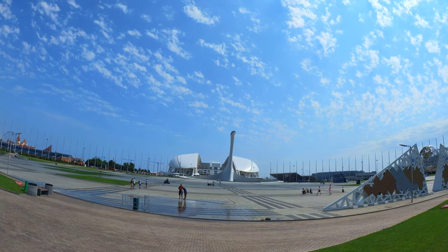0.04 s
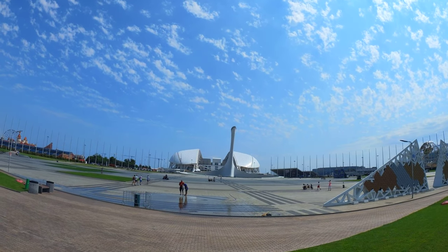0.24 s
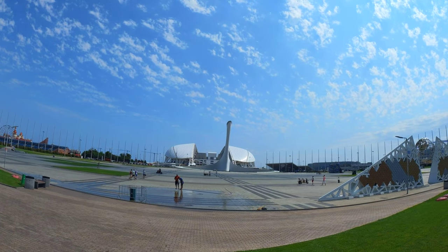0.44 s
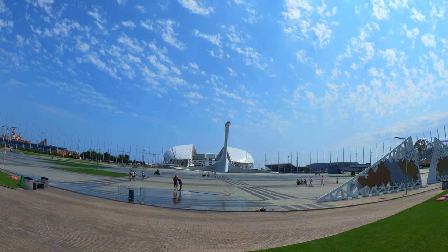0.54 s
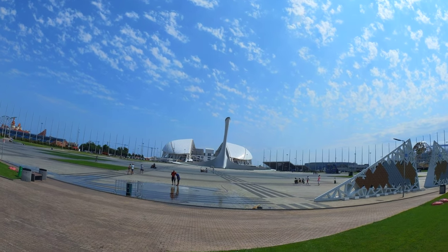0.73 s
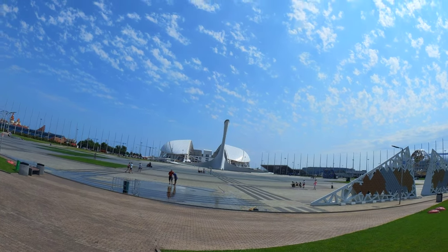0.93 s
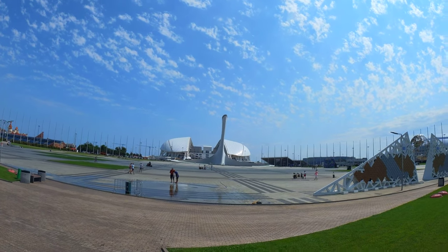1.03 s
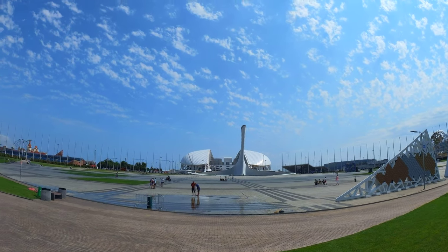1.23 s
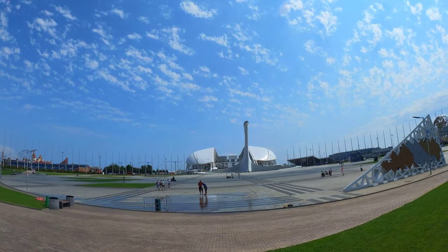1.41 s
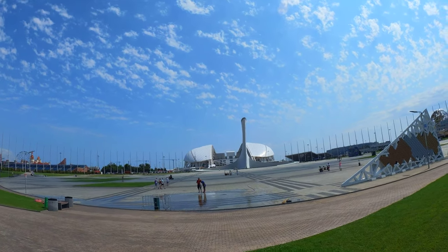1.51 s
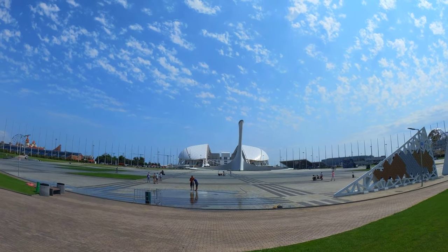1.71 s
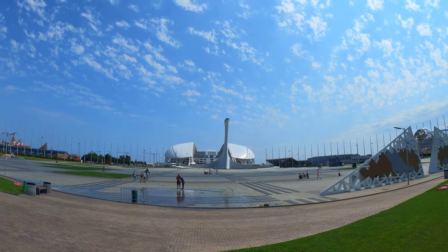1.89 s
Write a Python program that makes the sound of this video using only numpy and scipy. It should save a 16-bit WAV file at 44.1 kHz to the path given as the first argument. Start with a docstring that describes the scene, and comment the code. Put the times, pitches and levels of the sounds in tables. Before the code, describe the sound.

Close, rough wind noise on two unprotected microphone ports, fluttering bass thuds and gritty airy bursts, a few dry knocks and faint loose-part chatter; wide at first, then centred and quieter, ending in light hiss.

```python
"""Gusty wind on two bare microphone ports

The wind blows on a small camera carried across an open paved square. Eddies thump on each port as
swelling pressure swings, over a lumpy rumble of shaped noise. Noise rings the port cavities as a whistle
with a thin hiss; knocks and loose parts ring as short decaying tones. After a second the right channel
fades over to the left port's sound."""
import sys
import numpy as np
from scipy import signal
from scipy.fft import rfft, irfft
from scipy.io import wavfile

SR = 44100
rng = np.random.default_rng(int(sys.argv[2]) if len(sys.argv) > 2 else 0)


def master_out(mix):
    """Clip the mix to full scale and print it as 16-bit PCM to the path in sys.argv[1]."""
    frames = np.transpose(np.atleast_2d(mix))
    ceiling = np.clip(frames, -1, 1)
    pcm = np.round(ceiling * 32767).astype(np.int16)
    wavfile.write(sys.argv[1], SR, pcm)


N = 85995

MONO_FROM_S, MONO_FADE_S = 1.003, 0.0019   # start and length of the fade to the left port alone


def amp(db):
    """Turn decibels into a gain."""
    return 10 ** (np.asarray(db) / 20)


def rms_one(x):
    """Scale to an average strength (rms) of 1."""
    return x / np.sqrt(np.mean(x ** 2, axis=-1, keepdims=True) + 1e-20)


def in_time(rows):
    """Join the rows of a curve by straight lines, giving each column one value per sample."""
    seconds, *columns = np.transpose(rows)
    return [np.interp(np.arange(N) / SR, seconds, column) for column in columns]


def drift(rate_hz):
    """Slow random wander for each port, with a spread of about 1: noise smoothed by a low-pass filter."""
    r = np.exp(-2 * np.pi * rate_hz / SR)
    noise = rng.standard_normal((2, N + SR))
    wander = rms_one(signal.lfilter([1], [1, -2 * r, r * r], noise))
    return wander[:, SR:]   # drop the first second, where the filter settles


def coloured(points):
    """Unrelated noise on each port, shaped by a spectrum that falls off steeply outside its ends."""
    hz, db = np.transpose(points)
    log_hz = np.log(hz)
    f = np.log(np.maximum(np.arange(N // 2 + 1) * SR / N, 1))
    shape_db = np.interp(f, log_hz, db)
    shape_db -= 40 * np.maximum(log_hz[0] - f, 0)
    shape_db -= 40 * np.maximum(f - log_hz[-1], 0)
    spectrum = rfft(rng.standard_normal((2, N)))
    return rms_one(irfft(spectrum * amp(shape_db), N))


def ring(x, hz, t60):
    """A resonance: a unit click starts a sine of height 1 that falls by 60 dB in t60 seconds."""
    r = amp(-60 / (t60 * SR))
    w = 2 * np.pi * hz / SR
    return signal.lfilter([0, np.sin(w)], [1, -2 * r * np.cos(w), r * r], x + 1e-18)


def mono_share():
    """0 while both ports are in use, 1 once only the left is."""
    return np.clip((np.arange(N) / SR - MONO_FROM_S) / MONO_FADE_S, 0, 1)


def buffets():
    """Each eddy is a few uneven pressure swings of wandering pitch under a bell-shaped swell."""
    # Eddies bursting on the left port, then on the right port.
    # Each row: middle in seconds, level in dB before the low-pass, pitch in Hz that the swings wander around.
    eddies = [
        [(0.148, -15.5, 184), (0.191, -9, 292), (0.218, -15, 221), (0.259, -13.5, 154), (0.307, -4, 203.7),
         (0.471, -12, 183), (0.504, -15.5, 244), (0.521, -8, 186.3), (0.603, -11.5, 257.6), (0.611, -8.5, 329),
         (0.695, -6.5, 156), (0.744, -11.5, 266), (0.808, -12.5, 167), (0.874, -6.5, 283), (0.913, -8, 273),
         (0.94, -11, 235), (1.046, -10.5, 300.6), (1.066, -14.5, 323), (1.382, -20.5, 154), (1.433, -27.5, 152),
         (1.506, -20.5, 134.5), (1.536, -20.5, 113), (1.56, -22.5, 112), (1.621, -22, 114), (1.947, -29, 710)],
        [(0.268, -9, 307), (0.296, -1, 235.5), (0.413, -16.5, 203.6), (0.485, -8.5, 115), (0.551, -18, 277),
         (0.66, -12.5, 200), (0.694, -16, 266), (0.825, -13.5, 231), (0.856, -6.5, 306), (0.893, -12, 169),
         (0.917, -16.5, 213), (0.997, -10.5, 181)],
    ]
    base_s, cycles = .005, 1.3   # length of a swell: a fixed part and some swings
    wobble, roughness = 0.2914, 0.57   # strength of the pitch wander and of the added noise
    out, t = np.zeros((2, N)), np.arange(N) / SR
    wander, rough = drift(95.0), drift(564.0)
    for port, rows in enumerate(eddies):
        turns = rng.uniform(0, 2 * np.pi, len(rows))
        for (s, db, hz), turn in zip(rows, turns):
            length = base_s + cycles / hz   # width of the bell at half its height
            first = max(int((s - 2 * length) * SR), 0)
            near = slice(first, int((s + 2 * length) * SR))
            pitch_factor = np.exp(wobble * wander[port, near])
            swing = np.sin(turn + 2 * np.pi * hz / SR * np.cumsum(pitch_factor))
            swell = np.exp(-np.log(16) * ((t[near] - s) / length) ** 2)
            out[port, near] += amp(db) * swell * (swing + roughness * rough[port, near])
    return signal.sosfilt(signal.butter(2, 450, fs=SR, output="sos"), out)


def rumble():
    """Low turbulence: shaped noise of lumpy level, unrelated on the two ports."""
    # Loudness under the eddies. Each row: time in seconds, level in dB before the random wander and side.
    loudness = [(0, -34.5), (.12, -38), (.2, -26.5), (.36, -29), (.5, -28), (.7, -25.5), (.9, -25.5),
                (1.015, -35.5), (1.08, -25.5), (1.12, -34.5), (1.15, -40.5), (1.2, -26.5), (1.226, -36.5),
                (1.265, -28), (1.47, -31), (1.6, -42), (1.645, -33), (1.68, -43), (1.8, -49), (1.95, -49)]
    # Tone in stereo, then in mono. Each row: frequency in Hz, relative level in dB per Hz.
    colour = [
        [(45, -64), (80, 1), (160, 1), (400, -7), (1000, -31.5)],
        [(45, 2), (80, 4), (160, 4), (400, -13), (1000, -36.5)],
    ]
    # Balance of the ports. Each row: time in seconds, left minus right in dB,
    # used 1.5 times in stereo and half in mono.
    balance = [(.14, -6.5), (.55, -1.5), (1.0, 3.5)]
    (db,), (pan_db,) = in_time(loudness), in_time(balance)
    mono = mono_share()
    noise = (1 - mono) * coloured(colour[0]) + mono * coloured(colour[1])
    side_db = (1.5 - mono) * pan_db * [[.5], [-.5]]
    lumps_db = 2.88 * drift(38.0)
    return amp(db + side_db + lumps_db) * noise


def stream():
    """Gritty airflow excites the port cavities and a thin, flickering treble hiss."""
    # Air streaming over the ports. Each row: time in seconds, level of the cavity band in dB,
    # level of the treble in dB, both before puffs, flutter and side.
    airflow = [(0, -66, -70.5), (.25, -59.5, -62), (.45, -45, -64.5), (.65, -37, -55.5), (.68, -53, -73.5),
               (.8, -44.5, -60), (.92, -49.5, -60), (1.06, -55.5, -75), (1.15, -49.5, -63), (1.4, -47, -52),
               (1.455, -65.5, -61), (1.52, -50, -51), (1.64, -59.5, -64.5), (1.7, -50.5, -51),
               (1.775, -49.5, -52), (1.81, -60, -60)]
    # Cavity resonances of the left port, then of the right. Each row: pitch in Hz, relative level in dB.
    cavities = [
        [(1400, 2), (2650, -3.5), (4300, -22)],
        [(1250, 16), (2000, 9.5), (3750, -4)],
    ]
    # How long they ring, left and right: swings until they have fallen by 60 dB.
    ring_cycles = (7, 15)
    # Treble tone in stereo, then in mono. Each row: frequency in Hz, relative level in dB per Hz.
    treble_colour = [
        [(5000, -7), (7000, -21), (10500, -5), (15500, -0.5)],
        [(4500, -9.5), (6300, -11), (8300, -7), (15500, -21)],
    ]
    roar_db, roar_power = 17, 1.29   # strong puffs also roar, in a band reaching below the cavities

    puff = puffs()
    cavity_gain, treble_gain = amp(in_time(airflow)) + puff
    mono = mono_share()
    gritty_air = rng.standard_normal((2, N)) * amp(3.5 * drift(300.0))

    cavity = []
    for air, modes, cycles in zip(gritty_air, cavities, ring_cycles):
        # neighbouring resonances have opposite signs
        cavity.append(sum(amp(db) * (-1) ** k * hz * ring(air, hz, cycles / hz)
                          for k, (hz, db) in enumerate(modes)))
    cavity = signal.sosfilt(signal.butter(2, [800, 5000], "band", fs=SR, output="sos"), cavity)
    roar = signal.sosfilt(signal.butter(2, [340, 900], "band", fs=SR, output="sos"), gritty_air)
    roar_gain = amp(roar_db) * puff[0] ** roar_power
    body = cavity_gain * rms_one(cavity) + roar_gain * rms_one(roar)

    treble = (1 - mono) * coloured(treble_colour[0]) + mono * coloured(treble_colour[1])
    flutter_db = 2.0 * drift(68.0)
    flicker_db = flutter_db + 3.0 * drift(50.0)
    right_lead_db = 2.5 * (3.5 - mono)   # right port louder than left
    side = amp(right_lead_db * [[-.5], [.5]])
    return side * (body * amp(flutter_db) + treble_gain * amp(flicker_db) * treble)


def puffs():
    """Gains for cavity band and treble: each puff of air rises suddenly, holds and dies quickly."""
    # Each row: start in seconds, time from start to fall in seconds, level of the cavity band in dB,
    # level of the treble in dB.
    gusts = [(0.259, 0.072, -52, -87), (0.462, 0.023, -37.5, -65), (0.495, 0.0035, -35.5, -62),
             (0.551, 0.022, -41, -55.5), (0.605, 0.018, -35.5, -50.5), (.764, 0.01, -42.5, -71),
             (0.823, 0.039, -38, -66), (0.978, 0.072, -46.5, -66), (1.075, 0.035, -29, -48.5),
             (1.243, 0.034, -37.5, -63)]
    rise_s, fall_s = .002, .007
    start, hold, *db = np.transpose(gusts)
    since = np.arange(N) / SR - start[:, None]
    rise = np.clip(since / rise_s, 0, 1)
    fall = np.exp(-np.maximum(since - hold[:, None], 0) / fall_s)
    return amp(db) @ (rise * fall)


def knocks():
    """Each knock is a short rough contact that rings the housing, most of all near its strongest pitch."""
    # Knocks on the housing. Each row: time in seconds, level in dB before side and resonance,
    # strongest pitch in Hz.
    hits = [(0.383, -17.5, 1380), (0.55, -13, 1210), (0.803, -24, 1610), (0.8959, -20, 1610),
            (0.9918, -25.5, 1980), (1.1976, -10.5, 2430), (1.6929, -12.5, 8400), (1.7844, -17, 1840)]
    # Housing resonances. Each row: pitch in Hz, relative level in dB, time to fall by 60 dB in seconds.
    housing = [(1220, -0.5, 0.0094), (1670, 2, 0.0079), (2126, -2, 0.011), (2574, -1, 0.0067),
               (4040, -10.5, 0.0089), (8200, -10, 0.0022)]
    contact_s = .0005   # the contact dies away by a factor e in this time
    right_lead_db = 15   # right port louder than left while both are in use
    favour_db_per_oct = 20.0   # loss away from the strongest pitch, for up to one octave
    s, db, pitch_hz = np.transpose(hits)
    at, stereo = (s * SR).astype(int), s < MONO_FROM_S
    level_db = db + stereo * right_lead_db * [[-.5], [.5]]
    luck_db = rng.normal(0, 1.0, (len(s), len(housing)))
    n = np.arange(200)
    fade = np.exp(-n / (contact_s * SR))
    clicks = np.zeros((2, N))

    crack_db = np.where(stereo, -40, -17)
    clicks[:, at] = amp(level_db + crack_db)
    out = signal.lfilter(fade * rng.standard_normal(200), 1, clicks)

    for k, (hz, mode_db, t60) in enumerate(housing):
        octaves_away = np.minimum(abs(np.log2(hz / pitch_hz)), 1)
        clicks[:, at] = amp(level_db + mode_db - favour_db_per_oct * octaves_away + luck_db[:, k])
        push = fade * np.cos(2 * np.pi * hz * n / SR)
        out += ring(signal.lfilter(push / fade.sum() * 2, 1, clicks), hz, t60)
    return out


def ticks():
    """A loose part chatters faintly at random and ticks twice clearly: short tones alike on both ports."""
    # Chatter. Each row: time in seconds, lowest level of a tick in dB before ringing.
    chatter = [(0, -64.5), (.17, -52), (.4, -50.5), (.5, -55.5), (1.95, -55.5)]
    # The two clearest ticks. Each row: time in seconds, level in dB before ringing, pitch in Hz.
    clear_ticks = [(1.1769, -37, 4240), (1.2207, -34, 4670)]
    ticks_per_s, ring_cycles = 130, 14.0   # average rate; swings until a tick has fallen by 60 dB
    floor_db, = in_time(chatter)
    extra_db = 3.2 * np.minimum(rng.exponential(1, N), 3)
    clicks = (rng.random(N) < ticks_per_s / SR) * amp(floor_db + extra_db)
    dealt = rng.integers(0, 6, N)   # each click gets one of six pitches
    struck = [(clicks * (dealt == k), hz) for k, hz in enumerate(np.geomspace(3000, 4300, num=6))]
    struck += [(amp(db) * (np.arange(N) == int(s * SR)), hz) for s, db, hz in clear_ticks]
    out = np.zeros(N)
    for k, (x, hz) in enumerate(struck):
        overtone_hz = (2 + k % 2 * .4) * hz
        out += ring(x, hz, ring_cycles / hz) + ring(x, overtone_hz, 2.1 / hz)
    return out


def scene():
    """All sources as they reach the two ports."""
    return buffets() + rumble() + stream() + knocks() + ticks()


def record(dry):
    """The right channel fades over to the left port; the bottom is cut, peaks are rounded, the top is cut."""
    peak_limit = 0.47   # rounding limit, where 1 is full scale
    mono = mono_share()
    both = np.array([dry[0], (1 - mono) * dry[1] + mono * dry[0]])
    both = signal.sosfilt(signal.butter(5, 63, "high", fs=SR, output="sos"), both)
    both = peak_limit * np.tanh(both / peak_limit)
    return signal.sosfilt(signal.cheby2(16, 70, 16300, fs=SR, output="sos"), both)


dry = scene()
out = record(dry)
master_out(out)
```